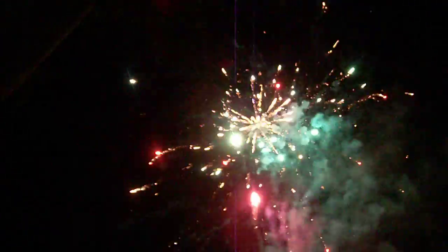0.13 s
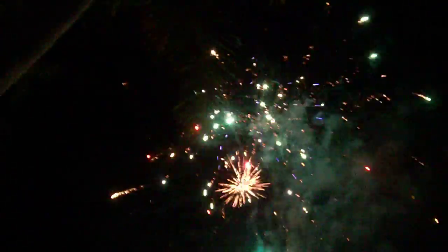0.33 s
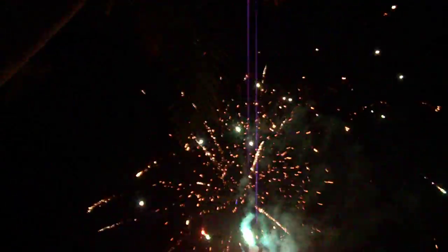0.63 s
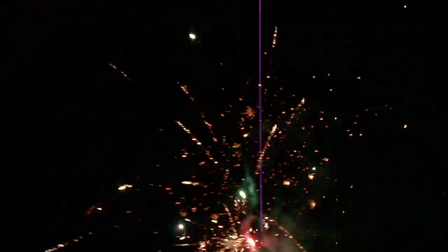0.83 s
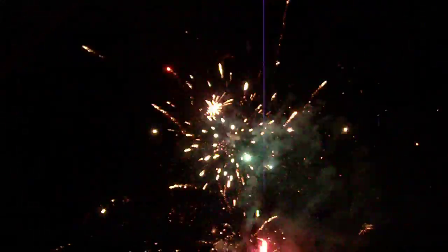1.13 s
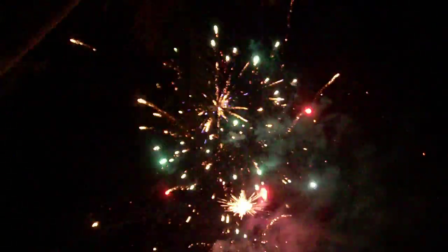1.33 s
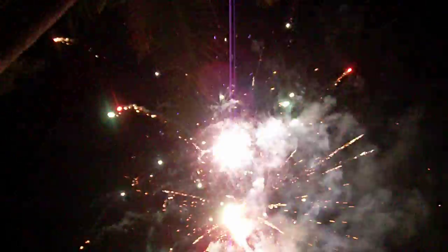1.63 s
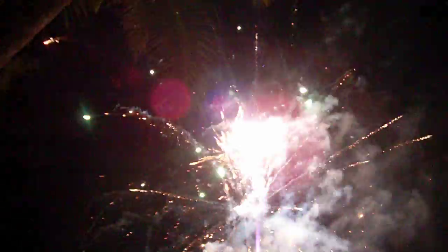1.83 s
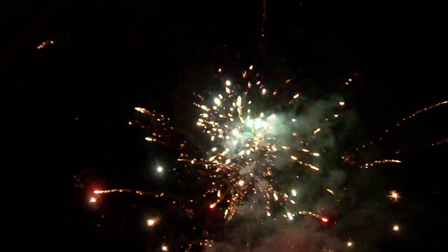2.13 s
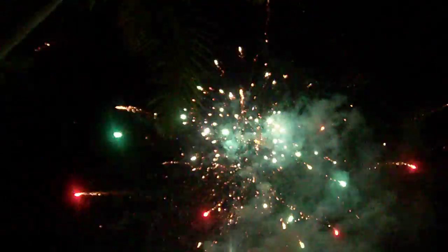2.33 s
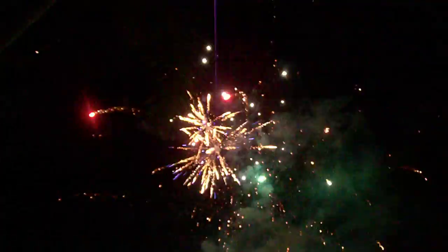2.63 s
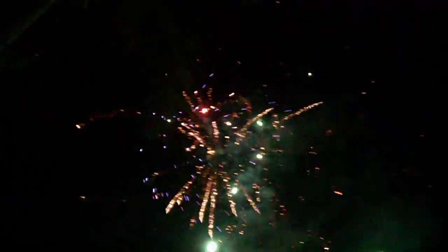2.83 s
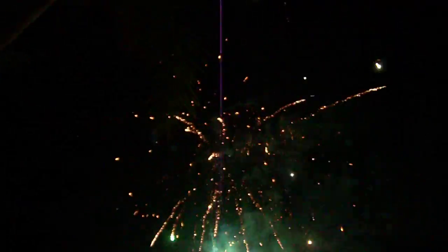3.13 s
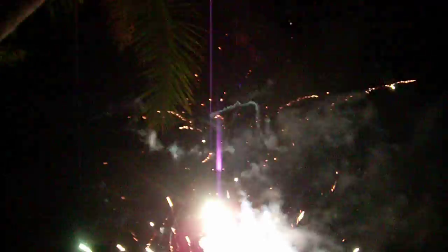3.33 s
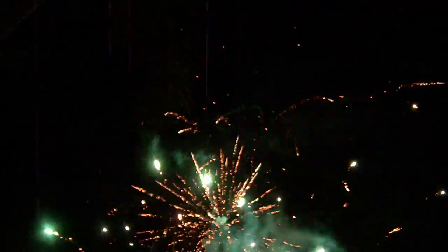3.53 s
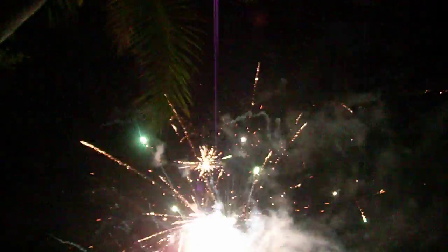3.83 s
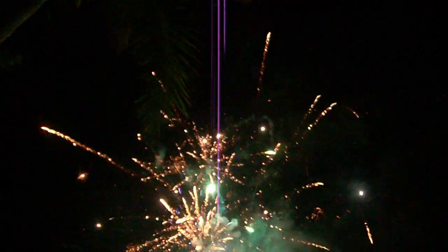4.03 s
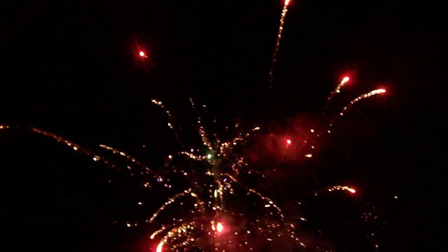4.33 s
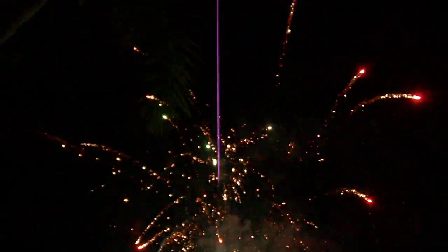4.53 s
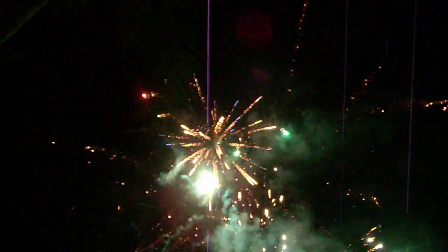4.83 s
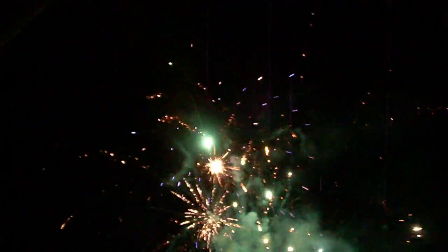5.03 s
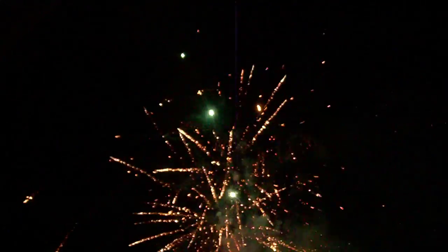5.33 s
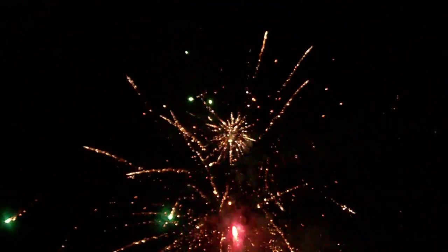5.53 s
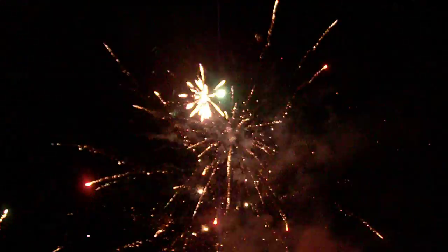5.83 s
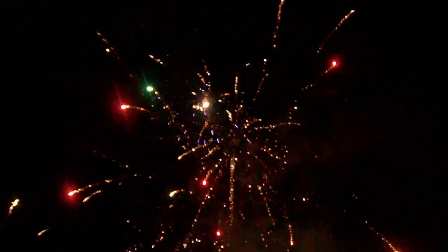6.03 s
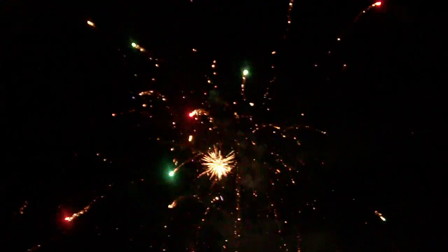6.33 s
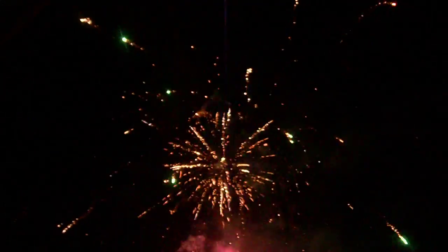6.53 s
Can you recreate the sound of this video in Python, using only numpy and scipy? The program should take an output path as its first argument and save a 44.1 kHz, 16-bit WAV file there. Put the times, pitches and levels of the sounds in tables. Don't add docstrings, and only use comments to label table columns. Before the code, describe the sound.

Rapid loud firework bursts snap and boom above a street, with sizzling crackles between them and the background dipping after every bang.

```python
import sys
import numpy as np
from scipy import signal
from scipy.fft import rfft, irfft
from scipy.io import wavfile
from scipy.ndimage import uniform_filter1d

SR = 44100
rng = np.random.default_rng(int(sys.argv[2]) if len(sys.argv) > 2 else 0)


def ratio(d):
    e = np.asarray(d, float) / 20
    return 10 ** e


def unload_wav(signal):
    wavfile.write(
        sys.argv[1],
        SR,
        np.round(np.clip(np.atleast_2d(signal).T, -1, 1) * 32767).astype(np.int16),
    )


N = 294588


def rms_one(x):
    return x / np.sqrt(np.mean(x ** 2) + 1e-20)


def dull(x, hz, kind="low"):
    return signal.sosfilt(signal.butter(2, np.clip(hz, 20, .45 * SR), kind, fs=SR, output="sos"), x)


def resonances(x, modes):
    for hz, width_hz, db in modes:
        w = 2 * np.pi * hz / SR
        a = ratio(db / 2)
        k = np.sin(w) * width_hz / hz / 2
        middle = -2 * np.cos(w)
        x = signal.lfilter([1 + k * a, middle, 1 - k * a], [1 + k / a, middle, 1 - k / a], x)
    return x


def drift(rate_hz):
    knots = rng.standard_normal(1200)
    return np.interp(np.arange(N) / SR * rate_hz, np.arange(len(knots)), knots) * np.sqrt(3 / 2)


def add(out, start_s, wave):
    i = int(round(start_s * SR))
    out[i:i + len(wave)] += wave[:max(N - i, 0)]


def blast(push_ms):
    t = np.arange(512) / SR * 1000 / push_ms
    return (1 - t) * np.exp(-t)


def explode(paths, start_s, level_db, ground_ms, wall_db, push_ms, soft_ground_db=0):
    direct, ground, wall = paths
    c = rng.standard_normal(12)
    wave = ratio(level_db) * blast(push_ms)
    add(direct, start_s, wave)

    wave = wave * ratio(soft_ground_db)
    add(ground, start_s + .0028, ratio(-21) * wave)
    add(ground, start_s + ground_ms / 1000, ratio(-2.5 + .7 * c[0]) * dull(wave, 6000))
    second_ms = ground_ms + 1.4 + .3 * c[9]
    add(ground, start_s + second_ms / 1000, ratio(-17 + 20 * push_ms + 1.5 * c[1]) * dull(wave, 4000))

    overhead_wall_ms, low_wall_ms = 96.8, 114.5
    level = np.sqrt(max(1 - (ground_ms / 9) ** 2, 0))
    wall_ms = overhead_wall_ms + (low_wall_ms - overhead_wall_ms) * level
    facets = [(-1.8, -9), (-.2, 0), (1.4, -1), (2.9, -7), (4.8, -9)]   # late_ms, level_db
    for k, (late_ms, facet_db) in enumerate(facets):
        facet = ratio(level_db + wall_db + facet_db + 2.8 * c[2 + k]) * dull(blast(0.48), 3640)
        add(wall, start_s + (wall_ms + late_ms + .2 * c[6 + k]) / 1000, facet)


# start_s [s], level_db [dB], ground_echo_lag_ms [ms], wall_echo_db [dB]
SHELLS = [(0.0962, 25.5, 7.51, -13.5), (0.4058, 29.5, 7, -10.5), (0.7994, 28.5, 5.9, -19),
          (1.0499, 29, 7.4, -13.5), (1.2627, 29.5, 7.84, -14.5), (1.4081, 31, 6.3, -16),
          (1.7889, 16, 7, -28), (1.8526, 17, 6.9, -10.5), (1.9712, 18.5, 7.26, -12.5),
          (2.5731, 20.5, 7.6, -7.5), (2.6063, 18.5, 7.41, -15.5), (3.0104, 34, 3.8, -22),
          (3.4534, 27, 6.17, -17.5), (3.6944, 21.5, 6.2, -16.5), (3.8794, 18.5, 6.98, -38.5),
          (3.9558, 19.5, 5.85, -19.5), (4.5264, 30, 4.8, -21.5), (4.7905, 22.5, 7.19, -5),
          (5.0519, 22, 6.21, -38), (5.129, 23.5, 6.92, -9), (5.5566, 21, 7.6, -10.5),
          (5.8843, 29, 7.4, -16.5), (6.4256, 24, 7.1, -5.5)]


def shells():
    paths = np.zeros((3, N))
    for start_s, level_db, ground_ms, wall_db in SHELLS:
        explode(paths, start_s, level_db, ground_ms, wall_db, push_ms=.3)
    return paths


# start_s [s], level_db [dB], ground_echo_lag_ms [ms]
LOW_CHARGES = [
    (0.7839, 19, 2.7),
    (2.4627, 8.5, 2.8),
    (3.417, 18, 1.7),
    (3.4431, 7.5, 4.6),
    (4.3868, 3.5, 3.2),
    (5.0424, 7, 2.4),
    (6.2282, 14.5, 2.65),
]


def charges():
    paths = np.zeros((3, N))
    ground = paths[1]
    for start_s, level_db, ground_ms in LOW_CHARGES:
        add(ground, start_s, ratio(level_db + 0.34 * (level_db - 9.5)) * fireball())
        add(ground, start_s, ratio(level_db - 1) * dull(blast(.3), 6300))
        explode(paths, start_s, level_db, ground_ms, wall_db=-27, push_ms=.6, soft_ground_db=-4)
    return paths


def fireball():
    ms = np.arange(2048) / SR * 1000
    rise = 1 - np.exp(-(ms / 0.72) ** 2)
    heave = ratio(3.5) * np.cos(2 * np.pi * .4 * ms + .5) * np.exp(-(ms / 1.48) ** 1.5)
    thump = -ratio(-18.5) * np.sin(2 * np.pi * 140 * ms / 1000) * np.exp(-ms / 2.9)
    debris = ratio(-11) * rms_one(dull(rng.standard_normal(len(ms)), 1800)) * np.exp(-ms / 3.5)
    ring_peak_ms, ring_hz = 2.6, 700
    age = ms / ring_peak_ms
    swell = (age * np.exp(1 - age)) ** 3
    ring = ratio(-5) * np.cos(2 * np.pi * ring_hz * (ms - ring_peak_ms) / 1000) * swell
    return rise * (heave + thump + debris + ring)


# start_ms [ms], rise_ms [ms], t60_ms [ms], level_db [dB], dull_above_hz [Hz]
STREET_SCATTER = [
    (.8, .5, 90, -40, 6000),
    (42, 12, 400, -53, 3500),
    (94, 12, 30, -50, 4000),
]


def street():
    ms = np.arange(SR // 2) / SR * 1000
    out = np.zeros(len(ms))
    for start_ms, rise_ms, t60_ms, level_db, dull_hz in STREET_SCATTER:
        age = np.maximum(ms - start_ms, 0)
        fade = ratio(-60 * np.maximum(age - rise_ms, 0) / t60_ms)
        shape = np.minimum(age / rise_ms, 1) * fade
        out += ratio(level_db) * shape * rms_one(dull(rng.standard_normal(len(ms)), dull_hz))
    return out


# start_s [s], peak_db [dB]
LONE_STARS = [(0.7031, -8.6), (1.0383, -8.0), (2.2334, -6.4), (2.2455, -5.6), (2.2919, -6.0),
              (2.3347, -7.0), (2.343, -4.6), (2.3479, -3.4), (3.2552, -6.7), (3.3184, -6.6), (4.2358, -3.7),
              (4.2759, -3.0), (4.3676, -1.5), (4.3739, -6.3), (5.7853, -5.4), (5.8009, -4.0)]
# start_s [s], length_s [s], level_db [dB]
STAR_SHOWERS = [
    (0.66, 0.02, -19),
    (1.008, 0.033, -9),
    (2.111, 0.17, -17),
    (3.223, 0.15, -14),
    (4.138, 0.2, -15),
    (5.781, 0.1, -12.5),
]


def near_stars():
    stars = list(LONE_STARS)
    gap_s = 4.8 / 1000
    for start_s, length_s, level_db in STAR_SHOWERS:
        gaps, sizes = rng.exponential(1, (2, 90))
        late = np.cumsum(.5 + .5 * gaps) * gap_s
        for late_s, size in zip(late, sizes):
            if late_s < length_s:
                swell_db = 2.5 * np.sin(np.pi * late_s / length_s)
                stars.append((start_s + late_s, level_db + swell_db + 2.5 * min(size, 2.5)))
    return stars


def crackle(level_db):
    born = rng.random(N) < 1800 * ratio(4.0 * drift(90)) / SR
    sizes = ratio(4 * np.minimum(rng.exponential(1, N), 3.5))
    grains = rms_one(born * sizes) + 0.3 * rng.standard_normal(N)
    flicker_db = 1.6 * drift(25)
    grains = ratio(level_db + flicker_db) * rms_one(signal.lfilter(blast(0.042), [1], grains))
    for (start_s, peak_db), lag_ms in zip(near_stars(), rng.uniform(.4, 1.6, 400)):
        add(grains, start_s, ratio(peak_db + 5) * blast(.09))
        add(grains, start_s + lag_ms / 1000, ratio(peak_db - 2) * blast(.08))
    return dull(grains, 9900)


# start_s [s], peak_db [dB], push_ms [ms]
FAR_REPORTS = [(0.0231, -13, 0.11), (0.2143, 1.5, 0.66), (3.105, 10, 0.1), (0.385, -7, 0.32),
               (0.5893, -4.5, 0.56), (0.7206, 4.5, 0.21), (0.872, -11, 0.072), (0.977, -6, 0.48),
               (1.1661, 7, 0.52), (1.2087, 4, 0.56), (3.988, -16, 0.3), (1.3579, 3, 0.3),
               (1.7076, -3, 0.21), (1.7235, 5.5, 0.33), (2.0454, -10, 0.88), (2.1581, -10, 0.54),
               (2.7525, -6.5, 0.51), (2.915, -21, 0.97), (2.9278, -4, 0.27), (1.896, -6, 0.2),
               (3.143, 9, 0.13), (3.5256, -1, 0.3), (3.678, -1, 0.32), (3.7436, -8, 1), (4.6576, 1, 0.35),
               (5.3698, 3.5, 0.21), (5.4421, -1, 0.21), (6.1725, -4, 0.29), (6.189, -7, 0.74),
               (6.3064, 2.5, 0.15)]


def far_reports():
    out = np.zeros(N)
    for start_s, peak_db, push_ms in FAR_REPORTS:
        c = rng.standard_normal(2)
        wave = ratio(peak_db + 5.0) * dull(blast(push_ms), 4800)
        add(out, start_s, wave)
        add(out, start_s + (1.7 + .3 * c[0]) / 1000, ratio(-4) * wave)
        add(out, start_s + (3.6 + .6 * c[1]) / 1000, ratio(-9) * wave)
    return out


# pitch_hz [Hz], level_db [dB per Hz]
ROAR_COLOUR = [(20, 3), (60, -10), (100, -6), (200, 3), (500, 4), (1000, 3), (2500, -2.5), (6000, -15),
               (16000, -28.5)]


def roar(level_db):
    hz = np.maximum(np.fft.rfftfreq(N, 1 / SR), 1)
    colour_hz, colour_db = np.transpose(ROAR_COLOUR)
    colour = ratio(np.interp(np.log(hz), np.log(colour_hz), colour_db))
    lumps = ratio(2.5 * drift(150) + 1.2 * drift(35))
    return ratio(level_db) * rms_one(irfft(rfft(lumps * rng.standard_normal(N)) * colour, N))


def aftermath(far_db, rule):
    peak_s, sharpness, swell_db, share = rule
    t = np.arange(0, N, 64) / SR
    power = np.zeros(len(t))
    for start_s, shell_db, *_ in SHELLS:
        age = np.maximum(t - start_s, 0) / peak_s
        swell = (age * np.exp(1 - age)) ** sharpness
        power += (ratio(swell_db + share * (shell_db - 30)) * swell) ** 2
    return 10 * np.log10(ratio(far_db) ** 2 + np.interp(np.arange(N) / SR, t, power))


# start_s [s], crackle_db [dB], roar_db [dB]
FAR_SKY = [(0.0, -34, -31), (0.4, -30, -21), (0.7, -40.5, -22.5), (1.7, -31, -24.5), (1.9, -39, -48),
           (2.3, -30, -33.5), (2.75, -30, -29), (2.9, -57, -24), (3.2, -33, -17.5), (3.38, -36, -26.5),
           (4.001, -35, -34), (4.35, -29.5, -34.5), (5.0, -27, -22), (5.35, -42, -21.5),
           (5.85, -28.5, -28.5), (6.05, -29, -20), (6.22, -25.5, -23), (6.68, -29, -19.5)]
# peak_after_s [s], sharpness [-], level_db [dB], share of its strength
# [dB/dB]
CRACKLE_SWELL = (0.12, 2.43, -18.5, 1.02)
# peak_after_s [s], sharpness [-], level_db [dB], share of its strength [dB/dB]
ECHO_SWELL = (0.2334, 3, -20.5, 0.9)


def sky():
    start_s, crackle_db, roar_db = np.transpose(FAR_SKY)
    t = np.arange(N) / SR
    stars = crackle(aftermath(np.interp(t, start_s, crackle_db), CRACKLE_SWELL) - 0.5)
    return stars + roar(aftermath(np.interp(t, start_s, roar_db), ECHO_SWELL) + 1.0)


# pitch_hz [Hz], width_hz [Hz], level_db [dB]
SIDE_MODES = [(821, 225, 8), (1175, 208, 13.5), (1630, 177, -7.5), (4854, 730, 10), (5730, 1280, 6.5),
              (10200, 7600, 6), (12470, 1900, 10.5), (15300, 2800, -9)]


def from_all_round(x):
    return resonances(x, SIDE_MODES)


def scene():
    direct, ground, wall = shells() + charges()
    scatter = signal.fftconvolve(direct, street())[:N]
    echoes = dull(wall + scatter, 126, "high")
    around = echoes + far_reports() + sky()
    return (direct + ground + from_all_round(around))[None]


# pitch_hz [Hz], width_hz [Hz], level_db [dB]
HOUSING_MODES = [(1130, 1970, -4), (1143, 200, -14), (2545, 1160, 10), (4000, 2200, 6.4),
                 (5600, 3470, -18.5), (9470, 3300, 15), (12650, 3350, -24), (15700, 2600, 1)]


def microphone(x):
    w = 2 * np.pi * 1011 / SR
    r = np.exp(-np.pi * 594 / SR)
    middle = -2 * r * np.cos(w)
    x = signal.lfilter([r * r, middle, 1], [1, middle, r * r], resonances(x, HOUSING_MODES))
    return dull(dull(x, 45, "high"), 16300)


def gain_control(x, sense_hz, limit_db, release_db, slope, lag_ms):
    power = uniform_filter1d(dull(x, sense_hz, "high") ** 2, size=176)
    climb = release_db * np.arange(N) / SR
    held = np.maximum.accumulate(10 * np.log10(power + 1e-9) + climb) - climb
    cut = uniform_filter1d(np.maximum(held - limit_db, 0), size=60)
    cut = np.interp(np.arange(N) - lag_ms * SR / 1000, np.arange(N), cut)
    return x * ratio(-slope * cut)


def roll_off(x):
    return signal.sosfilt(signal.butter(12, 16100, fs=SR, output="sos"), x)


def record(dry):
    x = gain_control(microphone(dry[0]), sense_hz=1450, limit_db=-18.0, release_db=77.5, slope=0.78, lag_ms=1.7)
    overloaded = np.clip(x, -.99, .99)
    top_cut = signal.cheby2(14, 80, 17200, fs=SR, output="sos")
    mix = signal.sosfilt(top_cut, overloaded)[None]
    return roll_off(mix)


dry = scene()
out = record(dry)
unload_wav(out)
```